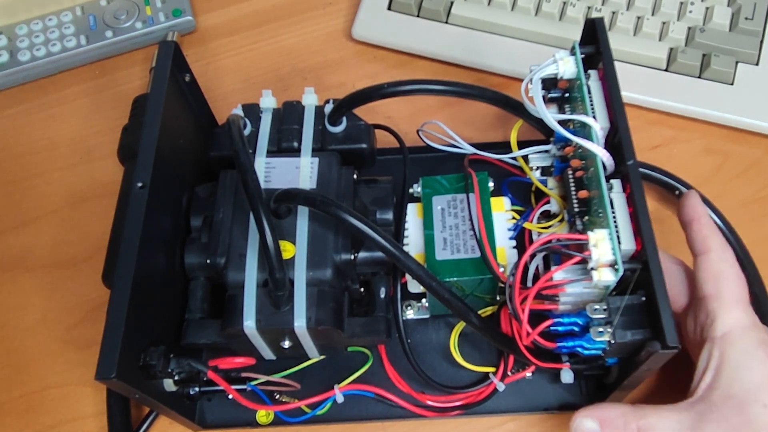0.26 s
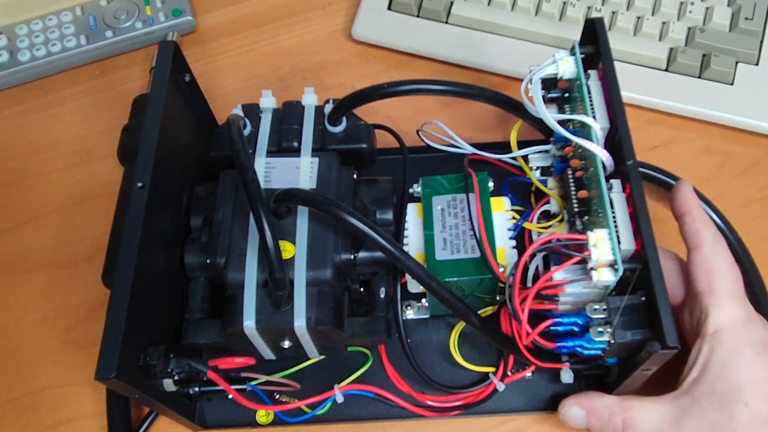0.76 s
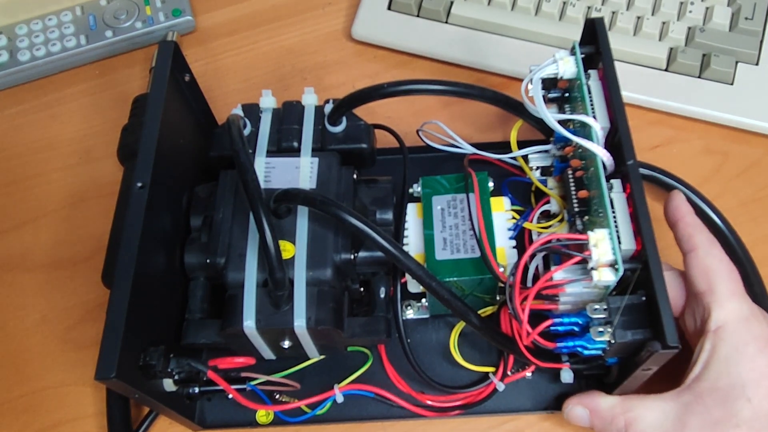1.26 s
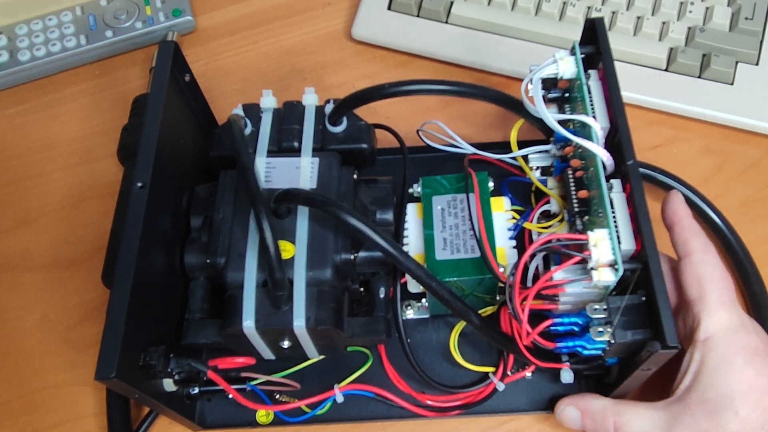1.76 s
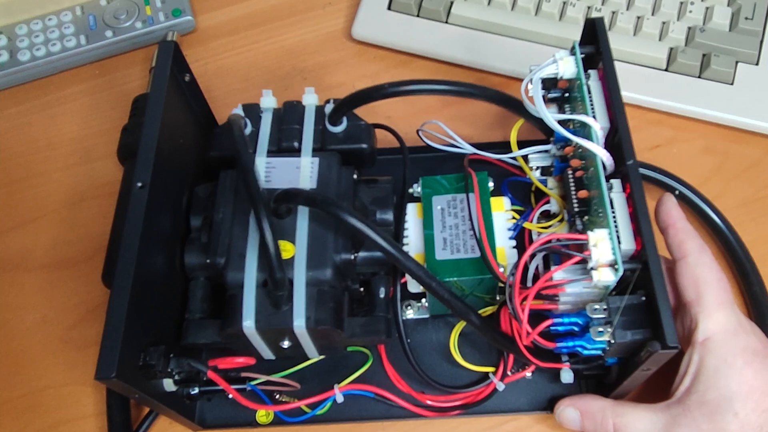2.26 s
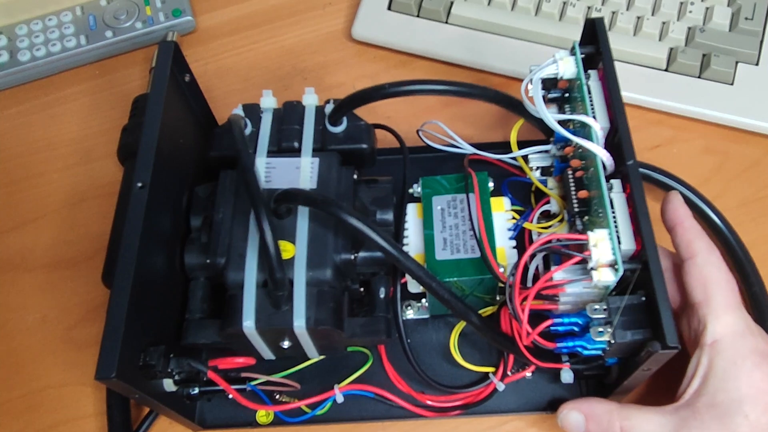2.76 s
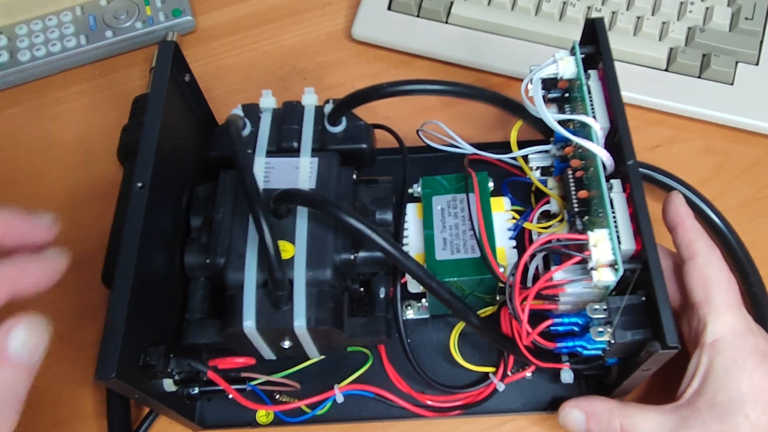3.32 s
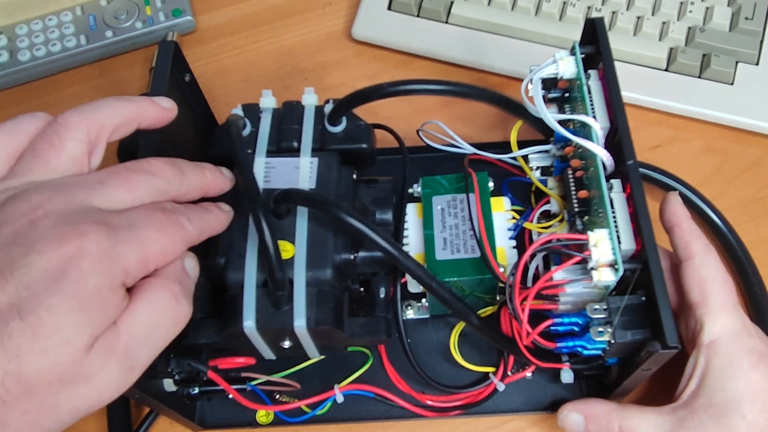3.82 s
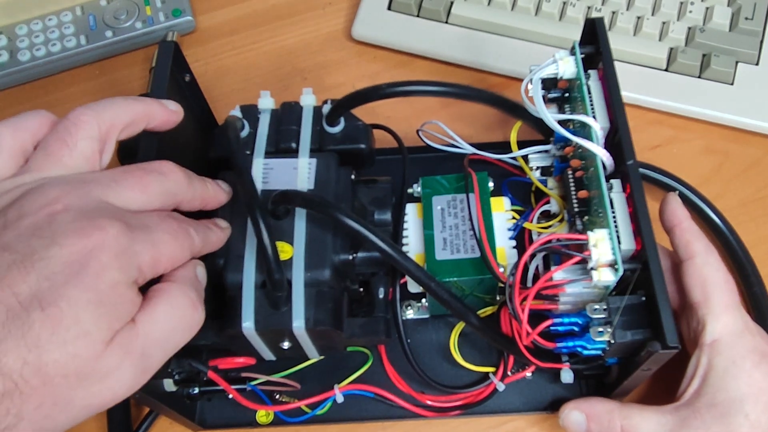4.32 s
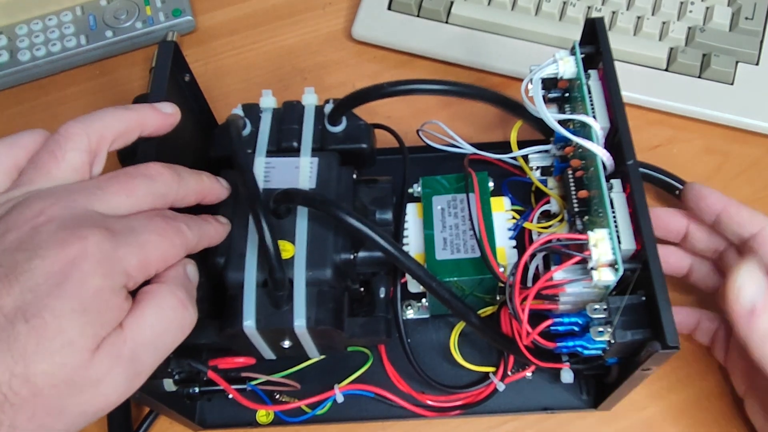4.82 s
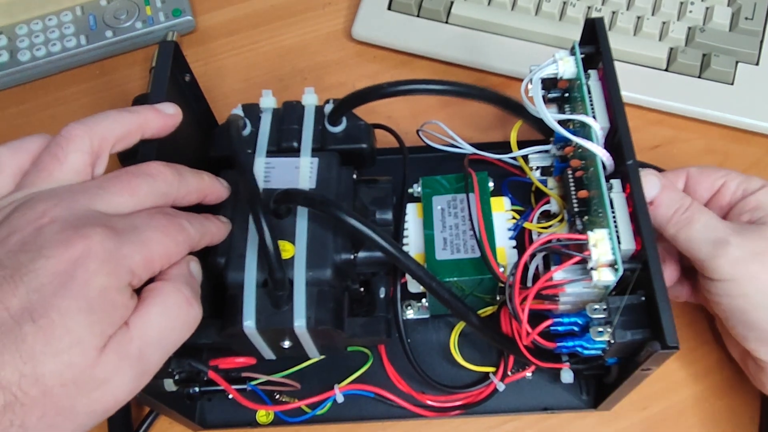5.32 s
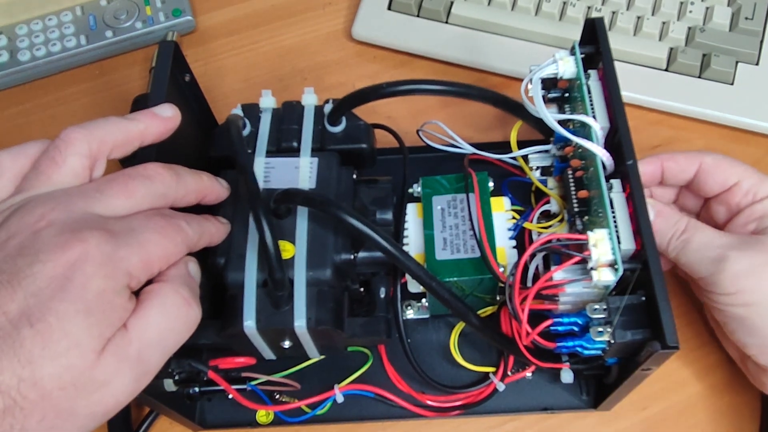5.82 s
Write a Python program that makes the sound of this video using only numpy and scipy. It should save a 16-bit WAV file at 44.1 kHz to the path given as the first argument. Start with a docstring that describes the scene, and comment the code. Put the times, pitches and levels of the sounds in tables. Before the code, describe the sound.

Close and dry on a desk: faint hand rustling, near silence, a sharp trigger click and low thud, a second click, and sudden loud pump noise. Harsh low buzz and bright rushing air run steadily, then sink over half a second into a soft drone. A thin steel rattle briefly swells, narrow hissing whistles come and go as hands move, and it settles slightly quieter at the end.

```python
"""The diaphragm pump of an open desoldering station kicks in with a hum and a pulsing rush of air.
The hum is a stack of mains multiples; the rush is noise that swells twice in every mains cycle.
First come the trigger and relay clicks, bursts of noise with ringing tones. A steel panel rattles along.
The sound eases after a second or so. Whistles and hissing jets, made of narrow gliding noise, come and go
while hands move on the case and hose. One microphone stands close by in a small, quiet room."""
import sys
import numpy as np
from scipy import signal
from scipy.fft import rfft, irfft, next_fast_len
from scipy.io import wavfile

SR = 44100
rng = np.random.default_rng(int(sys.argv[2]) if len(sys.argv) > 2 else 0)


def int16_out(signal):
    """Quantize to a 16-bit WAV file."""
    q = np.round(np.clip(np.atleast_2d(signal).T, -1, 1) * 32767)
    wavfile.write(sys.argv[1], SR, q.astype(np.int16))


N = 268304
TIME = np.arange(N) / SR  # seconds
MAINS_HZ = 50.017
START, SPIN_UP = 1.568, 0.03  # the pump starts (s), and reaches full stroke this much later (s)
EASE_START, EASE_END = 2.605, 3.19  # the whole sound eases between these times (s)
SETTLE_START, SETTLE_END = 5.53, 5.91  # most layers settle a little lower between these times (s)


def amp(db):
    """Turns decibels into a gain."""
    return 10 ** (np.asarray(db) / 20)


def unit(x):
    """Scales a sound to an average (rms) strength of 1."""
    return x / np.sqrt(np.mean(x ** 2) + 1e-20)


def read(points, hz):
    """Reads a spectrum in dB at any frequency, in straight lines over log frequency."""
    point_hz, db = np.transpose(points)
    return np.interp(np.log(hz + 1), np.log(point_hz + 1), db)


def add(mix, start, sound):
    """Mixes a sound in at a start time in seconds."""
    part = mix[round(start * SR):][:len(sound)]
    part += sound[:len(part)]


def noise(colour, size=N):
    """Makes noise of rms 1 whose spectrum follows the gain function colour(Hz)."""
    length = next_fast_len(size)
    hz = np.fft.rfftfreq(length, 1 / SR)
    spectrum = rfft(rng.standard_normal(length)) * colour(hz)
    return unit(irfft(spectrum, length)[:size])


def drift(count):
    """Wanders smoothly by chance with rms 1; count random points span the scene."""
    return unit(signal.resample(rng.standard_normal(count), next_fast_len(N))[:N])


def band(hz, width):
    """Makes a narrow band of noise, rms 1, by shifting two slow noises up to the pitch curve hz."""
    def slow_noise():
        return noise(lambda f: 1 / (1 + (1.7 * f / width) ** 2.4), size=len(hz))
    turn = 2 * np.pi * np.cumsum(hz) / SR
    return unit(slow_noise() * np.cos(turn) + slow_noise() * np.sin(turn))


def bands(rows, fade):
    """Lets narrow bands of noise swell, glide and fade; a row that starts before 0 s is cut there."""
    out = np.zeros(N)
    for start, end, first_hz, last_hz, width, db in rows:
        size = max(round((end - start) * SR), 64)
        glide = band(np.linspace(first_hz, last_hz, size), width)
        sound = amp(db) * glide * signal.windows.tukey(size, fade)
        add(out, max(start, 0), sound[max(round(-start * SR), 0):])
    return out


def swell(start, end, db):
    """Gives a gain that arches to db and back between two times."""
    progress = np.interp(TIME, [start, end], [0, 1])
    return amp(db * np.sin(np.pi * progress) ** 2)


def rise_and_die(t, db, rise, t60):
    """Rises in a straight line for rise seconds, then falls by 60 dB in t60 seconds."""
    return np.minimum(t / rise, 1) * amp(db - 60 * np.maximum(t - rise, 0) / t60)


def running():
    """Swings the diaphragm up to full stroke: 0 before the start, then 1."""
    return np.clip((TIME - START) / SPIN_UP, 0, 1)


def eased():
    """Is 0 while the sound is loudest and 1 once it has eased."""
    return np.interp(TIME, [EASE_START, EASE_END], [0, 1]) ** 2


def level(stages_db):
    """Gives the gain of a layer as the sound holds, eases, holds again and settles."""
    loudest, soft, settled = amp(stages_db)
    return np.interp(TIME, [EASE_START, EASE_END, SETTLE_START, SETTLE_END], [loudest, soft, soft, settled])


def partial(order):
    """Makes one multiple of the mains, rms 1, from a random point in its cycle."""
    return np.sqrt(2) * np.cos(2 * np.pi * (order * MAINS_HZ * TIME + rng.random()))


def strokes(depth, lopsided=0.019):
    """Moves the air in two puffs a mains cycle, one a little stronger."""
    turn = 2 * np.pi * (MAINS_HZ * TIME - .14)
    return 1 + depth * np.cos(2 * turn) + lopsided * np.cos(turn)


# Resonances of the open case and tubes.
# Each row: pitch in Hz, width in Hz, lift in dB (each layer takes its own share of it).
CHAMBER = [(1403, 310, 0.5), (2030, 140, 1), (3405, 73, 9), (4020, 110, 8.5), (4580, 414, 11.5),
           (5155, 66, 12), (5750, 870, 5), (7300, 85, 2.5), (9870, 350, 2.5), (10670, 280, 5),
           (11460, 180, 9), (12550, 240, 9.5), (12740, 190, 3), (13700, 610, 5), (14300, 570, 9)]


def resonances(hz):
    """Gives the lift in dB that the case and tubes give each frequency."""
    return sum(db / (1 + (2 * (hz - f) / width) ** 2) for f, width, db in CHAMBER)


def through_tubes(x, share):
    """Colours a sound with a share of the lift of the case and tubes."""
    length = next_fast_len(N)
    lift_db = share * resonances(np.fft.rfftfreq(length, 1 / SR))
    return irfft(rfft(x, length) * amp(lift_db), length)[:N]


# Colour of the room noise. Each row: frequency in Hz, relative level in dB per Hz.
FLOOR = [(18, -62), (30, -28.5), (111, 3), (225, -4), (256, 0.5), (709, -10), (921, -11), (1770, -15),
         (2130, -16), (4090, -17.5), (4780, -17), (5170, -19), (15500, -19.5)]


def room(floor_db=-63.5, rustle_db=-39, rustle_t60=0.31, rustle_hz=12000):
    """Fills the room with quiet steady noise, plus a bright rustle that dies away at first."""
    floor = amp(floor_db) * noise(lambda hz: amp(read(FLOOR, hz)))
    rustle = noise(lambda hz: 0.19 + 1 / (1 + (rustle_hz / (hz + 1)) ** 10))
    return floor + rustle * amp(rustle_db - 60 * TIME / rustle_t60)


# Fingers rub the case.
# Each row: start in seconds, end in seconds, first pitch in Hz, last pitch in Hz, width in Hz, level in dB.
RUBS = [(-.04, .06, 450, 430, 480, -49), (-.04, .06, 121, 115, 50, -48),
        (.32, .44, 14900, 15000, 1200, -60), (.2, .32, 330, 280, 200, -51.5), (.2, .28, 770, 720, 150, -65),
        (3.5, 4.2, 340, 340, 90, -62)]


def fingers():
    """Fingers rubbing the case make short soft bands of noise."""
    return bands(RUBS, fade=.9)


# Dull knocks of the case on the desk.
# Each row: start in seconds, pitch in Hz, level in dB, rise in seconds, time to fall by 60 dB in seconds.
KNOCKS = [(.218, 293.6, -45, 0.01, 0.22), (.23, 110, -53.5, .025, .25), (1.151, 109, -54, .03, 0.3),
          (1.311, 115, -27.5, 0.018, 0.27), (1.305, 191, -33.5, 0.017, 0.25),
          (1.588, 109, -19, 0.045, 0.15)]


def knocks():
    """The case rocks on its feet and the desk booms briefly, each boom a dying low tone."""
    t, out = TIME[:SR // 2], np.zeros(N)
    for start, hz, db, rise, t60 in KNOCKS:
        add(out, start, rise_and_die(t, db, rise, t60) * np.sin(2 * np.pi * hz * t))
    return out


def switch(contacts, tone, modes, tail_db, tail_t60, hold):
    """A sprung contact touches, snaps home and bounces; its parts ring, and the tail drops after hold seconds."""
    t, out = TIME[:SR // 2], np.zeros(N)

    def colour(hz):
        less_bass = hz ** 2 / (hz ** 2 + 200 ** 2)
        return amp(read(tone, hz) + 0.4 * resonances(hz)) * less_bass

    def burst(db, rise, t60):
        return rise_and_die(t, db, rise, t60) * noise(colour, size=len(t))

    for start, db, rise, t60 in contacts:
        add(out, start, burst(db, rise, t60))
    ring = sum(amp(db - 60 * t / t60) * np.sin(2 * np.pi * hz * t) for hz, db, t60 in modes)
    ring = ring * np.minimum(t / 0.0034, 1)
    tail = ring + burst(tail_db, 0.0039, tail_t60)
    snap_time = contacts[1][0]  # the ringing starts with the second touch
    add(out, snap_time, tail / (1 + (t / hold) ** 10))
    return out


# Touches of the trigger contact.
# Each row: start in seconds, level in dB, rise in seconds, time to fall by 60 dB in seconds.
TRIGGER = [(1.2905, -16, .003, 0.028), (1.2932, -10.5, 0.0019, 0.027), (1.307, -24.5, 0.0016, 0.056)]
# Colour of the trigger's noise. Each row: frequency in Hz, relative level in dB per Hz.
TRIGGER_TONE = [(300, -15), (500, -25.5), (650, -26.5), (1150, -4), (1600, -7.5), (1850, -18), (2200, -10),
                (2800, -18.5), (3500, -8), (4600, 0), (6000, -9.5), (8200, 0.5), (11000, -8), (15000, -4.5)]
# Tones the trigger rings with. Each row: pitch in Hz, level in dB, time to fall by 60 dB in seconds.
TRIGGER_MODES = [(486, -50, 0.25), (1044, -49.5, 0.19), (1340, -51, .16), (1560, -30.5, 0.11),
                 (2174, -41.5, 0.35), (4260, -35, 0.15), (4360, -30.5, 0.24), (5100, -36, .1),
                 (5900, -20, 0.1), (10000, -19.5, .12), (11940, -7, 0.04), (14000, -28, 0.087),
                 (14000, -20, .11)]


def trigger():
    """The trigger clicks: noise bursts at each touch, then ringing parts."""
    return switch(TRIGGER, TRIGGER_TONE, TRIGGER_MODES, tail_db=-18.5, tail_t60=0.27, hold=0.14)


# Touches of the relay contact.
# Each row: start in seconds, level in dB, rise in seconds, time to fall by 60 dB in seconds.
RELAY = [(1.5605, -28, 0.0018, .02), (1.5635, -25, .001, 0.021), (1.5672, -38, .001, 0.02)]
# Colour of the relay's noise. Each row: frequency in Hz, relative level in dB per Hz.
RELAY_TONE = [(290, -64), (500, -46), (927, -24), (2970, -44), (4020, -7), (4770, -31), (5590, -4),
              (7130, -33), (7890, -6.5), (11600, -1.5), (15500, -4.5)]
# Tones the relay rings with. Each row: pitch in Hz, level in dB, time to fall by 60 dB in seconds.
RELAY_MODES = [(4060, -46, 0.053), (5650, -24, 0.046), (8270, -38, .08), (9200, -15, 0.031),
               (11540, -18, 0.069), (13700, -10, 0.036)]


def relay():
    """The relay closes with a click, in the same way as the trigger."""
    return switch(RELAY, RELAY_TONE, RELAY_MODES, tail_db=-17, tail_t60=0.16, hold=.13)


# Whistles of the air stream. Each row: start in seconds, end in seconds, first pitch in Hz,
# last pitch in Hz, level in dB before the tubes lift it.
WHISTLES = [(2.644, 3.2, 4030, 4000, -51), (2.806, 3.303, 2780, 2760, -50.5),
            (2.803, 3.55, 13000, 13000, -45), (2.9, 3.651, 2443, 2370, -53.5),
            (3.15, 3.326, 4900, 4540, -52), (3.35, 4.562, 3490, 3520, -59),
            (4.662, 4.792, 8400, 8200, -44.5), (4.64, 4.902, 12900, 14000, -38),
            (4.722, 5.117, 5840, 6270, -44), (4.884, 5.089, 13600, 13800, -30),
            (4.913, 5.27, 14000, 15100, -39), (4.95, 5.758, 9700, 8800, -44.5),
            (5.097, 5.546, 4900, 5050, -51), (5.14, 5.7, 7270, 7200, -54),
            (5.3, 5.848, 13000, 12850, -47.5), (5.35, 5.687, 2490, 2580, -53)]


def whistles(flicker_db=1.27, width_share=.057):
    """Breathy whistles, narrow gliding bands of noise, flutter in the tubes as the hose is moved."""
    # each whistle is as wide as a share of its first pitch
    rows = [(start, end, first, last, width_share * first, db) for start, end, first, last, db in WHISTLES]
    whistling = through_tubes(bands(rows, fade=0.77), share=0.45)
    return whistling * strokes(depth=0.084) * amp(flicker_db * drift(count=240))


# Hissing air jets, silent until the pump runs. Each row: start in seconds, time it begins to sink in seconds,
# stop in seconds, pitch in Hz, sinking in Hz per second, level in dB before the tubes lift it.
JETS = [(1.3, 2.244, 3.99, 14170, 1853, -36), (3.4, 3.749, 4.72, 14200, 904, -43.5)]


def jet(attack_s=0.28, release_s=.45, fade_db_per_s=6, width_hz=2000):
    """The hiss of each air jet sinks in pitch and fades, waking one tube resonance after another."""
    out = np.zeros(N)
    for start, sinks, stop, hz, sag_hz_per_s, db in JETS:
        sinking_s = np.maximum(TIME - sinks, 0)
        gate = np.clip(np.minimum((TIME - start) / attack_s, (stop - TIME) / release_s), 0, 1)
        hiss = band(hz - sag_hz_per_s * sinking_s, width_hz)
        out += gate * amp(db - fade_db_per_s * sinking_s) * hiss
    return running() * through_tubes(out, share=1.0) * strokes(depth=0.058)


# Base level of the ringing tubes: at its loudest, once eased and once settled, in dB per Hz.
TUBES_DB = (-81, -92.5, -98)


def tubes(wander_db=4.5, flutter_db=2.5):
    """Each resonance of the case and tubes swells, fades and flutters on its own."""
    out = np.zeros(N)
    for hz, width, lift in CHAMBER:
        gain = amp(lift + wander_db * drift(count=30) + flutter_db * drift(count=500))
        out += gain * np.sqrt(width) * band(np.full(N, hz), width)
    return running() * level(TUBES_DB) * out


# A panel sings along with the hum.
# Each row: start in seconds, end in seconds, multiple of the mains, level in dB.
PANEL = [(4.14, 4.32, 14, -49), (4.29, 4.53, 14, -50), (4.12, 4.36, 19, -58), (5.3, 6.6, 4, -65)]


def panel():
    """A loose panel briefly picks up single partials of the hum."""
    out = np.zeros(N)
    for start, end, order, db in PANEL:
        t = np.arange(round(start * SR), round(end * SR)) / SR
        tone = np.sqrt(2) * np.sin(2 * np.pi * round(order) * MAINS_HZ * t)
        add(out, start, amp(db) * signal.windows.tukey(len(t), .6) * tone)
    return out


# Level of the rattle before grip and shaking: at its loudest, once eased and once settled, in dB.
RATTLE_DB = (-35, -54, -41)


def rattle(ring_hz=(1255, 1315), ring_t60=0.07, taps_per_s=500, locked=0.52, uneven_db=1.25, shake_db=6,
           damp_start=4.3, damp_db_per_s=12):
    """A steel panel chatters on the frame: irregular taps, partly locked to the strokes, ring two close modes.
    It shakes harder as the loose panel starts to sing; a hand resting on the case slowly stills it."""
    t, out = TIME[:SR // 10], np.zeros(N)
    on_stroke = np.diff(np.floor(MAINS_HZ * TIME), prepend=0)  # one tap each mains cycle
    for hz in ring_hz:
        by_chance = rng.uniform(-1.22, 1, N) * (rng.random(N) < taps_per_s / SR)
        ring = amp(-60 * t / ring_t60) * np.sin(2 * np.pi * hz * t)
        out += signal.oaconvolve(by_chance + locked * on_stroke, ring)[:N]
    damping_db = damp_db_per_s * np.maximum(TIME - damp_start, 0)
    grip = amp(uneven_db * drift(count=120) - damping_db)
    sing_start, sing_end = PANEL[0][:2]
    return unit(out) * level(RATTLE_DB) * grip * swell(sing_start, sing_end, shake_db) * running()


# Base level of the low flutter, shared by chatter and rush: at its loudest, once eased and once settled, in dB.
FLUTTER_DB = (-31, -48.5, -52)


def chatter(db=-9.5, eased_db=-9.2, fall_db=14, scatter_db=3, first_hz=1450, last_hz=3600):
    """The valves slap the same way every cycle, filling in the high multiples of the mains."""
    orders = np.arange(round(first_hz / MAINS_HZ), round(last_hz / MAINS_HZ))
    phase = np.linspace(0, 1, 2048)
    turn, luck = rng.random((len(orders), 2)).T
    # fall_db is the loss for each tenfold rise in pitch
    gains = amp(scatter_db * np.sqrt(12) * luck - fall_db * np.log10(orders))
    cycle = unit(gains @ np.cos(2 * np.pi * (orders[:, None] * phase + turn[:, None])))
    slaps = np.interp(MAINS_HZ * TIME % 1, phase, cycle)  # one cycle, repeated
    return slaps * level(FLUTTER_DB) * amp(db + eased_db * eased()) * running()


def stream(spectrum, lift, split_hz=3000):
    """Makes turbulence with a share of the resonances' lift, split into a low flutter and a high hiss."""
    air = noise(lambda hz: amp(read(spectrum, hz) + lift * resonances(hz)))
    low = signal.sosfiltfilt(signal.butter(2, split_hz, fs=SR, output="sos"), air)
    return np.array([low, air - low])


# Colour of the air at its loudest. Each row: frequency in Hz, relative level in dB per Hz.
LOUD_AIR = [(30, -27), (65, -24), (115, 4), (220, -7), (500, -1), (1100, 8.5), (1700, 1), (2400, 3),
            (3500, 2.5), (5000, 1), (7300, 0.5), (9000, 7), (11000, 3), (14500, 6), (15700, 3.5)]
# Colour of the air once eased. Each row: frequency in Hz, relative level in dB per Hz.
SOFT_AIR = [(30, -21), (65, -25), (115, -14), (220, -23), (500, -3), (1100, 6.5), (1700, -1), (2500, 3.5),
            (3700, 1), (5500, -2.5), (7500, 0.5), (11000, 2.5), (14500, 5.5), (15700, 7.5)]
# Base level of the high hiss: at its loudest, once eased and once settled, in dB.
HISS_DB = (-41, -54.5, -59)


def rush(loud_db=(6.5, 18), soft_db=(6.5, 15)):
    """Air pulses through the valves as noise; the two gains of each pair are for flutter and hiss."""
    soft = eased()
    loud_air = amp(loud_db)[:, None] * stream(LOUD_AIR, lift=0.74)
    soft_air = amp(soft_db)[:, None] * stream(SOFT_AIR, lift=0.57)
    flutter, hiss = np.sqrt(1 - soft) * loud_air + np.sqrt(soft) * soft_air
    flutter = flutter * level(FLUTTER_DB) * amp(1.03 * drift(count=900)) * strokes(depth=0.088)
    hiss = hiss * level(HISS_DB) * amp(0.49 * drift(count=900)) * strokes(depth=0.16)
    return running() * (flutter + hiss)


# The hum at its loudest. Each row: multiple of the mains, relative level in dB.
LOUD_ORDERS = [(1, -43), (2, -1), (3, -10.5), (4, -14), (5, -39), (6, -10.5), (7, -15.5), (8, -4), (9, -45),
               (10, -4), (11, -37), (12, -7), (13, -7), (14, -5), (15, 0.5), (16, -8.5), (17, -3.5),
               (18, -11), (19, -4.5), (20, -10), (21, -3.5), (22, -4), (23, -4.5), (24, -23), (25, -9)]
# The hum once eased. Each row: multiple of the mains, relative level in dB.
SOFT_ORDERS = [(1, -44), (2, 0), (3, -8.5), (4, -6), (5, -47), (6, -6), (7, -8.5), (8, 0), (9, -58),
               (10, -1), (11, -13), (12, -2), (13, -4), (14, -8), (15, 2.5), (16, -11), (17, -4.5),
               (18, -4), (19, -6.5), (20, -12), (21, -0.5), (22, -2), (23, -10), (24, -7.5), (25, -3)]
# Upper partials of the buzzing housing.
# Each row: pitch in Hz (played at the nearest multiple of the mains), relative level in dB.
BUZZ = [(1400, -45), (1550, -46.5), (1701, -52), (1798, -54), (1900, -60), (2003, -50), (2051, -59),
        (2110, -59), (2148, -53), (2202, -51), (2299, -48), (2353, -84), (2401, -52), (4000, -42.5),
        (4301, -71), (4404, -42), (5249, -44)]
# Base level of hum and buzz: at its loudest, once eased and once settled, in dB.
HUM_DB = (-35.5, -54.5, -55.5)
# Level of the drone, the second multiple, outside its dip: at its loudest, once eased and once settled, in dB.
DRONE_DB = (-40.7, -57, -56.5)
# The drone dips briefly: start in seconds, end in seconds, change in dB.
DRONE_DIP = (5.52, 5.9, -9)


def hum(loud_db=-5, soft_db=-7, buzz_db=34.5, buzz_eased_db=4, dull_db_per_khz=2.5, waver=0.08):
    """The armature strokes at the mains rate; the housing radiates its multiples, the upper ones less steadily."""
    soft, out = eased(), np.zeros(N)
    for order, (loud, quiet) in enumerate(zip(LOUD_ORDERS, SOFT_ORDERS), 1):
        if order != 2:  # the drone plays the second multiple
            gain = (1 - soft) * amp(loud[1] + loud_db) + soft * amp(quiet[1] + soft_db)
            out += gain * partial(order) * (1 + waver * drift(count=90))
    for hz, db in BUZZ:
        # the highest partials fade more as the sound eases
        change_db = soft * (buzz_eased_db - dull_db_per_khz * hz / 1000)
        tone = partial(round(hz / MAINS_HZ)) * (1 + 2 * waver * drift(count=120))
        out += amp(db + buzz_db + change_db) * tone
    drone = level(DRONE_DB) * swell(*DRONE_DIP) * partial(2.0)
    return running() * (out * level(HUM_DB) + drone)


def scene():
    """Everything reaches one microphone, on two equal channels."""
    handling = fingers() + knocks() + trigger() + relay()
    air = whistles() + jet() + tubes() + rush()
    pump = panel() + rattle() + chatter() + hum()
    mono = room() + handling + air + pump
    return np.array([mono, mono])


def record(dry):
    """The microphone sheds the deepest bass; a steep filter then removes the highest treble."""
    bass_cut = signal.butter(4, 42, "high", fs=SR, output="sos")
    thin = signal.sosfilt(bass_cut, dry)
    treble_cut = signal.firwin(511, 15760, window=("kaiser", 9), fs=SR)  # cutoff in Hz
    return signal.oaconvolve(thin, treble_cut[None], "same")


dry = scene()
out = record(dry)
int16_out(out)
```